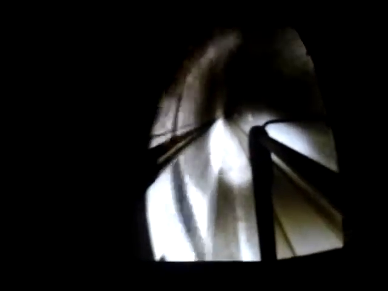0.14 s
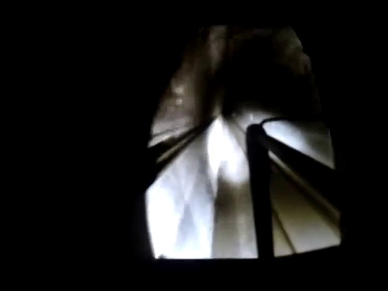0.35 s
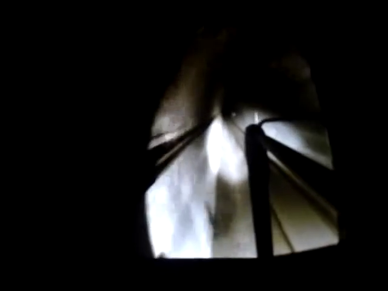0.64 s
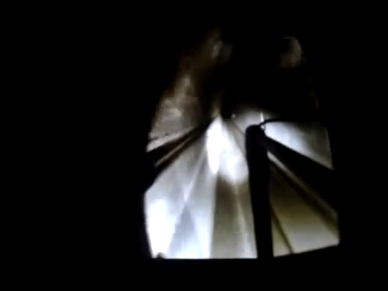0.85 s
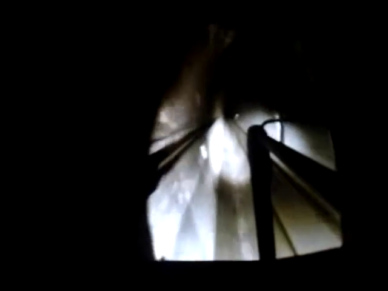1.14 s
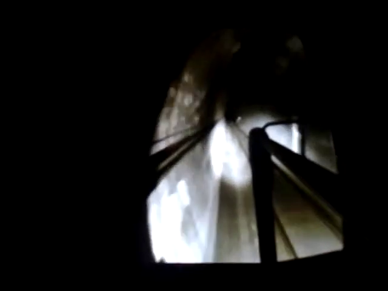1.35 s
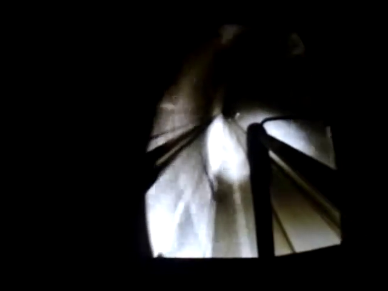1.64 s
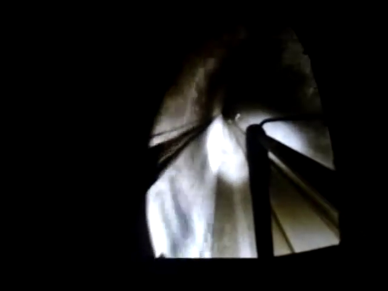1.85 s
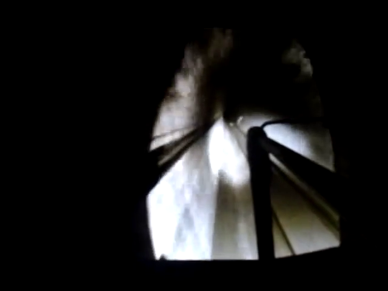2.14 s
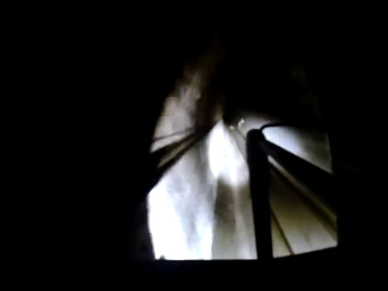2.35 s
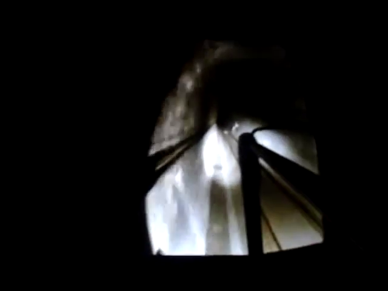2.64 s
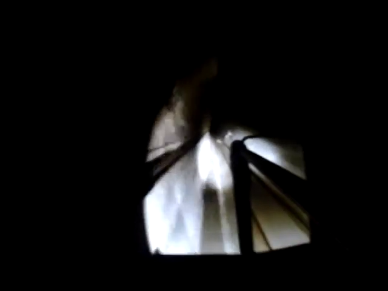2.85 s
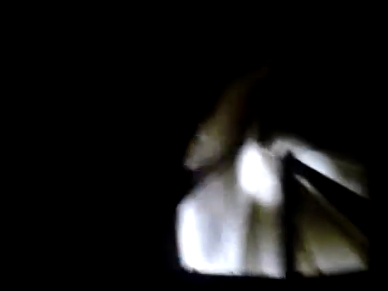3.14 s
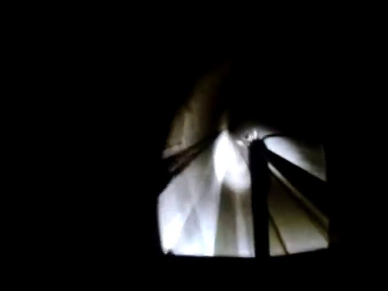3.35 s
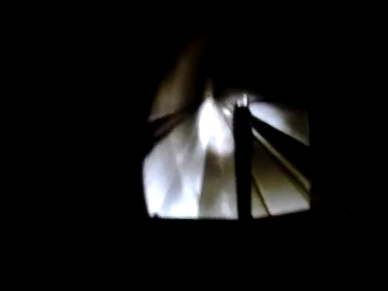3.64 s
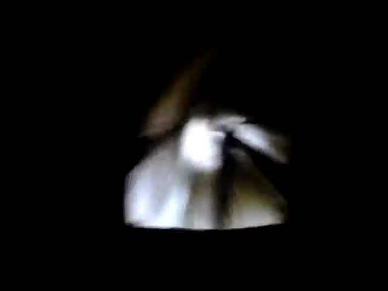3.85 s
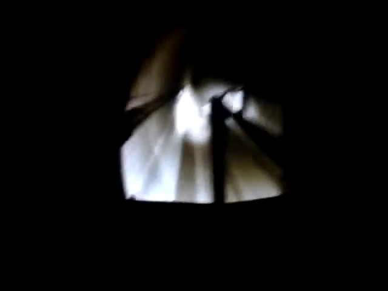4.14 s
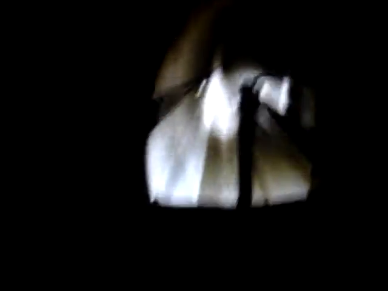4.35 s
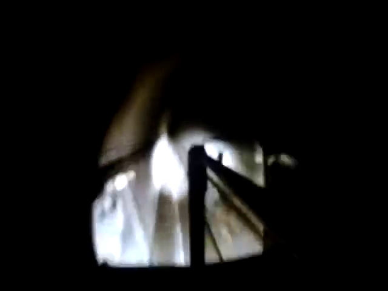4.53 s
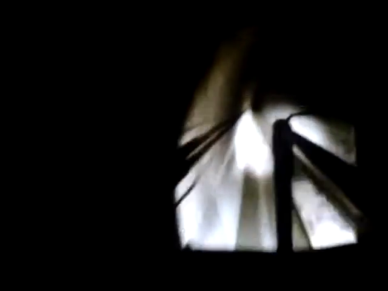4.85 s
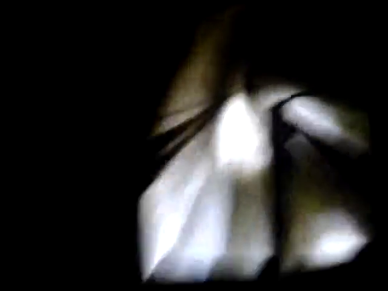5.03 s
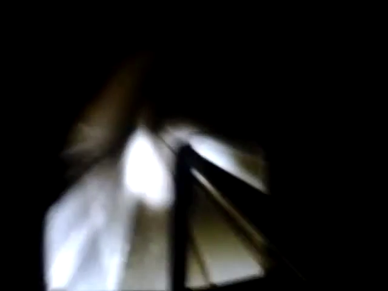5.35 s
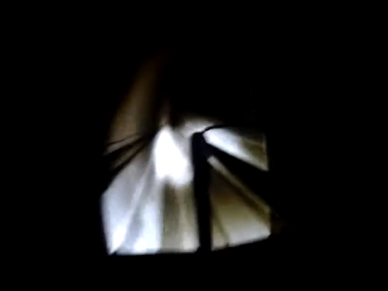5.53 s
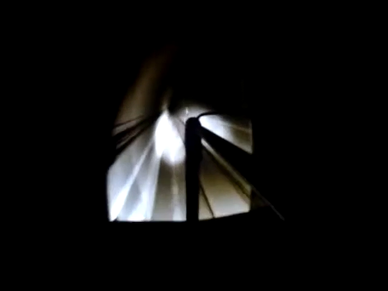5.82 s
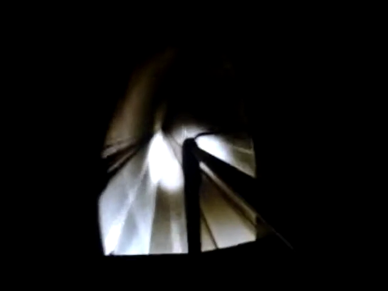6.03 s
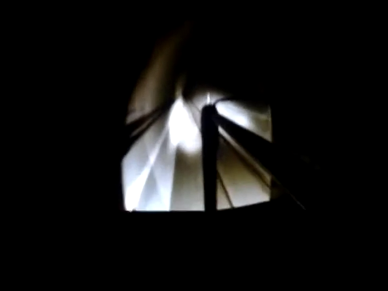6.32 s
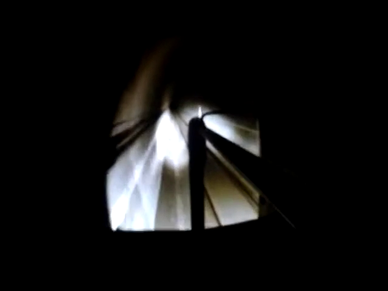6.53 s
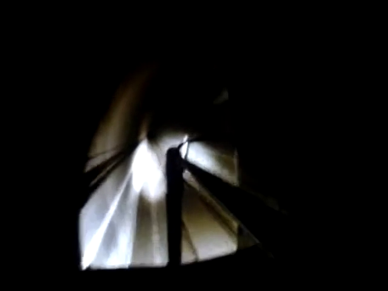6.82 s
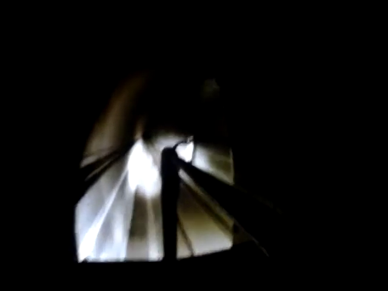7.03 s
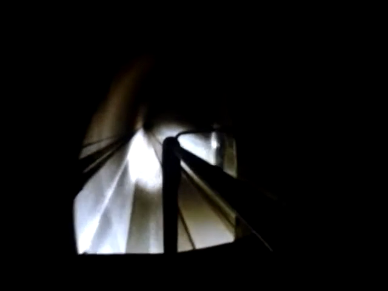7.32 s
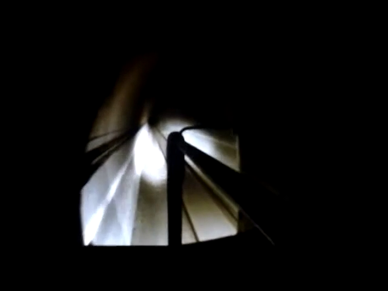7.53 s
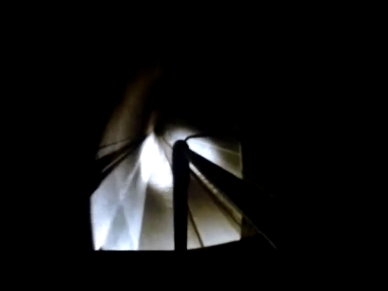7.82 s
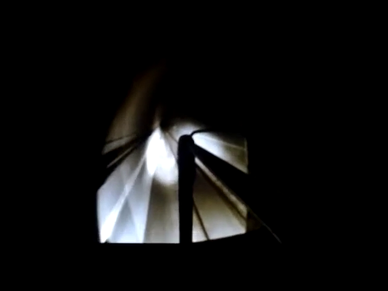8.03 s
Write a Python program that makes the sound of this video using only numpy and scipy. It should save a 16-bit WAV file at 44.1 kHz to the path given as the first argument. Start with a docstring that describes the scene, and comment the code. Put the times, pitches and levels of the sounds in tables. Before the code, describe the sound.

Steady roar of railcar wheels in a tunnel with hissing air, then a click and scrape before the wind rush grows louder and harsher.

```python
"""The roar of wheels in a tunnel is heard first, with air rushing past a window in gusts and lulls.
A diesel railcar carries the hand-held camera; its faint engine and gear whine lie beneath.
The camera is shifted with a click and a scrape, and the rush turns louder and harsher.
Roar and rush are noise with moving spectra, engine and gears are sums of sines, and knocks and
clicks are decaying bursts of band noise."""
import sys
import numpy as np
from scipy import signal
from scipy.fft import rfft, irfft
from scipy.io import wavfile
from scipy.ndimage import uniform_filter1d

SR = 44100
rng = np.random.default_rng(int(sys.argv[2]) if len(sys.argv) > 2 else 0)


def persist_wave(psi):
    """Save psi, clipped to +-1, as 16-bit WAV."""
    counts = np.round(np.clip(psi, -1, 1) * 32767).astype(np.int16)
    wavfile.write(sys.argv[1], SR, np.atleast_2d(counts).T)


N = 360728
TIME = np.arange(N) / SR  # s

# reflections in the sheltered corner that cancel or lift bands: f/Hz, width/Hz, level/dB
CORNER_BANDS = [(2335, 79, -8), (4640, 85, -0.5), (5220, 190, 2.5), (5870, 230, -6), (6340, 170, 9),
                (7280, 190, -8.5), (7760, 130, 0), (8700, 180, -3), (9600, 180, -7), (10150, 200, 3),
                (10900, 180, -5)]
# lulls, when the flow breaks away from the window:
# t/s, length/s, depth/dB, strength of the further treble loss/dB
FLOW_LULLS = [(4.19, 0.23, 0, 10), (4.23, 0.044, 4, 0), (5.669, 0.094, 2, 10), (5.755, 0.044, 5, 1),
              (6.32, 0.19, 2.5, 0), (6.655, 0.088, 1, 7), (7.506, .06, 2, 0)]


def gain_of(db):
    """Level to amplitude: 20 dB is a factor of ten."""
    return 10 ** (np.asarray(db) / 20)


def evened(x):
    """Normalization to unit root-mean-square value."""
    return x / np.sqrt(np.mean(x ** 2) + 1e-20)


def read(points, hz):
    """Spectral level in dB, interpolated linearly along a log-frequency axis."""
    f, db = np.transpose(points)
    return np.interp(np.log(hz + 1), np.log(f + 1), db)


def follow(rows, t):
    """Linear interpolation in time of each column of a curve."""
    s, *columns = np.transpose(rows)
    return [np.interp(t, s, column) for column in columns]


def bell(hz, centre, width):
    """Gaussian resonance curve of height 1; the width is its standard deviation."""
    return np.exp(-.5 * ((hz - centre) / width) ** 2)


def bands(rows, hz):
    """Superposition in dB of Gaussian peaks and hollows."""
    return sum(db * bell(hz, centre, width) for centre, width, db in rows)


def swells(rows, t):
    """Superposition in dB of Gaussian swells, each as long as its width at half height."""
    return sum(db * 2 ** -np.minimum((2 * (t - s) / length) ** 2, 20) for s, length, db in rows)


def noise(shape_db):
    """Stationary noise of rms 1: white noise filtered by a function of frequency in dB."""
    spectrum = rfft(rng.standard_normal(N))
    hz = np.fft.rfftfreq(N, 1 / SR)
    return evened(irfft(spectrum * gain_of(shape_db(hz)), N))


def wander(slow_hz, fast_hz):
    """Random modulation: slow noise of rms 1, band-limited between two rates."""
    count, rate_hz = 4096, 400
    f = np.fft.rfftfreq(count, 1 / rate_hz)
    above_slow = 1 + (slow_hz / (f + 1e-6)) ** 4
    below_fast = 1 + (f / fast_hz) ** 4
    band = (above_slow * below_fast) ** -.5
    drift = evened(irfft(rfft(rng.standard_normal(count)) * band))
    return np.interp(TIME, np.arange(count) / rate_hz, drift)


def burst(s, rise, decay, centre_hz, octaves):
    """Impulsive excitation: band noise of rms 1 under an envelope that peaks at 1 at time s."""
    count = 2 ** 14
    hz = np.fft.rfftfreq(count, 1 / SR)
    shape = bell(np.log2(hz + 1), np.log2(centre_hz), octaves)
    band = evened(irfft(rfft(rng.standard_normal(count)) * shape))
    t = TIME - s
    envelope = np.exp(-np.minimum(np.maximum(-t / rise, t / decay), 20))
    return np.resize(band, N) * envelope


def microphone_hiss(level_db=-65):
    """Self-noise of the microphone: faint, white and stationary."""
    return gain_of(level_db) * rng.standard_normal(N)


def engine(waver=0.0045, throb_db=1.0):
    """Periodic combustion: harmonics of the crankshaft rate, which sags at two gear changes."""
    # crankshaft: t/s, f/Hz
    shaft_curve = [(0, 31.66), (1.0, 28.48), (1.4, 30.31), (3.0, 31.83), (3.95, 31.55), (5.05, 27.6),
                   (8.18, 29.1)]
    # orders: multiple of the crankshaft rate, relative level/dB
    orders = [(4, -15.5), (6, -4.5), (7, -3), (8, -6), (9, -2.5), (10, -3.5), (12, -2)]
    idle_db, idle_hz = -58, 28.6
    db_per_hz, coast_db_per_hz_s = 1.8, 1.2  # louder with speed, quieter while it slows down
    shaft_hz = follow(shaft_curve, TIME)[0]
    slowing = np.maximum(-np.gradient(shaft_hz, TIME), 0)  # Hz/s
    level_db = idle_db + db_per_hz * (shaft_hz - idle_hz) - coast_db_per_hz_s * slowing
    angle = 2 * np.pi * np.cumsum(shaft_hz * (1 + waver * wander(0.75, 9.7))) / SR
    harmonics = 0
    for order, db in orders:
        amplitude = gain_of(db + throb_db * wander(1, 8.1))
        harmonics = harmonics + amplitude * np.sin(order * angle + 2 * np.pi * rng.random())
    return gain_of(level_db) * harmonics


def gear_tone(hz, db, waver=0.0054, throb_db=3.6):
    """Tooth-mesh tone: a sine with small random modulation of frequency and amplitude."""
    amplitude = gain_of(db + throb_db * wander(3.2, 14))
    return amplitude * np.sin(2 * np.pi * np.cumsum(hz * (1 + waver * wander(2.4, 19))) / SR)


def whine():
    """Mesh and resonance: a gear tone sinks as a panel drones; later two drive tones swell."""
    # sinking gear tone: t/s, f/Hz, level/dB
    sinking = [(0, 840, -43), (.25, 841, -34.5), (.6, 820, -37.5), (.9, 795, -38), (1.13, 757, -37),
               (1.4, 735, -59), (1.9, 680, -63)]
    # ringing body panel: t/s, level/dB
    panel_level = [(0, -41), (.5, -43), (.75, -50.5)]
    # the drive sings at full speed: t/s, level/dB
    singing = [(2.4, -61), (3.1, -41), (3.65, -39.5), (4.1, -43), (4.6, -54)]
    # tones of the singing drive: f/Hz, relative level/dB
    sing_tones = [(757, 1.5), (998, 0)]
    panel_hz, panel_width_hz = 460.4, 14
    resonance = noise(lambda f: -20 * np.log10(1 + ((f - panel_hz) / panel_width_hz) ** 2))
    panel = gain_of(follow(panel_level, TIME)[0]) * resonance
    sing_db = follow(singing, TIME)[0]
    drive = sum(gear_tone(hz, sing_db + db) for hz, db in sing_tones)
    return gear_tone(*follow(sinking, TIME)) + panel + drive


def handling(octaves=0.86):
    """Contact and friction: fingers on the camera body give dry clicks and scrapes."""
    # touches: t/s, level/dB, rise/s, decay/s, centre f/Hz
    touches = [(3.0288, -10, 0.00016, 0.00056, 9700), (3.03, -56, .004, 0.011, 50),
               (3.033, -43, .002, .01, 11000), (3.099, -29, 0.0074, 0.0077, 12000),
               (3.106, -19, 0.00034, 0.0008, 9500), (3.145, -42, .015, .025, 11000),
               (3.161, -32, .001, .003, 10000), (3.81, -56, 0.018, .03, 12500),
               (3.866, -38, 0.0032, .004, 12400), (4.35, -62, .02, .04, 12500),
               (4.515, -45, .001, .002, 8000), (4.57, -55, .02, .006, 12500)]
    return sum(gain_of(db) * burst(s, rise, decay, hz, octaves) for s, db, rise, decay, hz in touches)


def jolts(rise=0.002, octaves=0.64):
    """Impact excitation: jolts from the track are short decaying bursts of noise."""
    # knocks: t/s, level/dB, centre f/Hz, decay/s
    knocks = [(.125, -33, 1500, 0.013), (1.052, -27, 700, 0.021), (1.395, -25.5, 2030, 0.03),
              (2.84, -29, 3230, 0.019), (3.47, -19, 2200, 0.0034), (4.026, -21.5, 2500, 0.05),
              (4.278, -18, 2310, 0.016), (5.44, -18, 2300, 0.02), (6.425, -18.5, 2220, 0.016)]
    return sum(gain_of(db) * burst(s + rise, rise, decay, hz, octaves) for s, db, hz, decay in knocks)


def gusting(t):
    """Unsteady flow: gusts lift its level in dB and lulls drop it."""
    # gusts that hit the window: t/s, length/s, strength/dB
    gusts = [(.12, 0.14, 4), (1.41, 0.055, 3), (4.39, 0.086, 3.5), (5.03, 0.069, 1), (5.49, 0.091, 2.5),
             (6.02, .16, 1.5), (6.245, 0.043, 0.5), (6.47, 0.093, 2.5), (6.59, 0.064, 2), (6.83, 0.12, 2),
             (7.39, 0.17, 2.5), (7.66, .12, 1.5), (8.11, 0.056, 3)]
    drops = [(s, length, db) for s, length, db, _ in FLOW_LULLS]
    return swells(gusts, t) - swells(drops, t)


def wheels(flutter_db=0.7, ring_hz=630, ring_width_hz=90, thinning=1.0):
    """Rolling contact: rail roughness excites a fluttering roar, hollow while the cab resonates."""
    # spectrum of the wheels in the tunnel: f/Hz, relative level/dB
    roar_spectrum = [(18, -80), (30, -48), (65, -57), (112, -29), (139, -35.5), (179, -20.5), (246, -24),
                     (282, -11), (412, -10), (451, -10.5), (502, -7), (649, 1.5), (722, -2), (920, -0.5),
                     (1120, -14), (1460, -24), (2460, -120)]
    # loudness of the wheels before gusts and flutter: t/s, level/dB
    rolling = [(0, -34), (1.05, -32.5), (1.9, -35.5), (3.0, -33.5), (3.58, -29), (4.05, -34), (4.92, -30.5),
               (4.99, -25), (5.1, -27.5), (5.42, -27), (5.62, -30.5), (8.18, -32)]
    t = np.arange(N // 512 + 5)[:, None] * 512 / SR
    hz = np.fft.rfftfreq(2048, 1 / SR)
    hollow_db = 2.5 * bell(t, 4.88, 0.43)  # centre and spread in s
    hollow_shape = bell(hz, ring_hz, ring_width_hz) - thinning * bell(hz, 340, 160)
    colour = gain_of(read(roar_spectrum, hz) + hollow_db * hollow_shape)
    a, b = rng.standard_normal((2,) + colour.shape)
    # each frame is normalized, so the colour does not alter the loudness
    z = (a + 1j * b) * colour / np.linalg.norm(colour, axis=1, keepdims=True)
    roar = evened(signal.istft(z.T, nperseg=2048, noverlap=1536)[1][:N])
    level_db = follow(rolling, TIME)[0] + gusting(TIME)
    return roar * gain_of(level_db + flutter_db * wander(3.8, 22))


def frame_echo(t, hz, null_width=0.12, lift_ratio=1.71, lift_width=0.22):
    """Interference, in dB: the window frame's echo cancels one band and lifts a higher one."""
    # gliding reference of the echo as the camera passes the frame: t/s, f/Hz
    glide = [(2.8, 2150), (2.92, 2630), (2.99, 2750), (3.05, 3450), (3.11, 2900), (3.17, 2960),
             (3.25, 3670), (3.5, 4040)]
    from_s, rise_s, until_s, fade_s = 2.76, 0.24, 3.61, 0.25
    depth_db, lift_db = 16, 6.5
    multiple = hz / follow(glide, t)[0]
    near = np.clip(np.minimum((t - from_s) / rise_s, (until_s - t) / fade_s), 0, 1)
    lift = lift_db * np.sqrt(near) * bell(multiple, lift_ratio, lift_width)
    return lift - depth_db * near * bell(multiple, 0.98, null_width)


def muffling(t, hz):
    """Flow separation, as a loss in dB: treble drops in a lull and corner reflections show through."""
    loss_db = swells([(s, length, db) for s, length, _, db in FLOW_LULLS], t)
    corner_per_db = .055  # share of the reflections for each dB of loss
    return loss_db * (bell(hz, 7850, 830) - corner_per_db * bands(CORNER_BANDS, hz))


def slipstream(patchy_db=0.98, buffet_db=0.81, split_hz=3900):
    """Turbulence: broadband rush and hiss, coloured by a gap resonance and by reflections."""
    # spectra of the air at three places of the microphone: f/Hz, relative level/dB
    sheltered = [(680, -26), (1150, -4.5), (1980, 4.5), (3770, -1.5), (4390, -12), (5160, -5.5),
                 (5820, -13), (6420, -17.5), (7390, -24), (15500, -59.5)]
    at_frame = [(680, -51), (1150, -13.5), (1660, -6), (1980, 1.5), (2380, -4.5), (3200, -4), (3770, -11),
                (4150, -10.5), (4730, -13.5), (6010, -12), (7720, -26), (8610, -27), (9920, -41),
                (15500, -63)]
    in_stream = [(680, -56), (1150, -16.5), (1370, -14), (1480, -10.5), (2000, 2), (2360, -7), (2960, -3),
                 (3730, -10.5), (4390, -8), (6150, -18), (6930, -37), (8520, -30), (11200, -51),
                 (15500, -60)]
    # lifts and a dip in the colour of the air in the stream: f/Hz, width/Hz, level/dB
    stream_bands = [(3060, 110, 1.5), (3700, 110, -4), (4220, 130, 2), (7070, 600, 5)]
    # t/s, place (0 sheltered, 1 at the frame, 2 in the stream), gap resonance level/dB
    place_curve = [(0, 0.07, 0.5), (2.5, 0.32, -0.5), (3.1, 0.73, 2.5), (3.6, 1.27, 4), (4.8, 0.66, -0.5),
                   (5.05, 0.85, -4), (5.4, 1.4, -0.5), (5.65, 1.3, 2.5), (5.82, 1.9, 0.5), (8.18, 1.9, 0.5)]
    # air reaching the microphone as the camera leans out, before gusts and buffeting:
    # t/s, rush level/dB, hiss level/dB
    airflow = [(0, -30, -32), (0.55, -31, -33), (0.95, -34.5, -42), (1.25, -31, -33), (2.2, -30, -32.5),
               (2.8, -32, -35), (3.07, -29, -31.5), (3.1, -22.5, -25), (3.28, -24, -31),
               (3.68, -17.5, -26.5), (3.95, -22, -31.5), (4.72, -27, -37.5), (4.925, -27, -31),
               (4.98, -21.5, -24.5), (5.25, -20, -25.5), (5.7, -19, -29), (5.83, -19, -25.5),
               (8.18, -20, -27)]
    gap_hz, gap_width_hz = 1980, 130  # air resonance of the window gap
    hiss_per_gust = .9  # dB for each dB of the rush
    t = np.arange(N // 128 + 5)[:, None] * 128 / SR
    hz = np.fft.rfftfreq(512, 1 / SR)

    place, gap_db = follow(place_curve, t)
    colours = [read(sheltered, hz) + bands(CORNER_BANDS, hz),
               read(at_frame, hz),
               read(in_stream, hz) + bands(stream_bands, hz)]
    # neighbouring places cross-fade in dB
    db = sum(np.maximum(1 - abs(np.clip(place, 0, 2) - k), 0) * colour for k, colour in enumerate(colours))
    db = db + gap_db * bell(hz, gap_hz, gap_width_hz)
    db = db + frame_echo(t, hz) - muffling(t, hz)

    colour_power = gain_of(db) ** 2
    upper = 1 / (1 + (split_hz / (hz + 1)) ** 10)
    rush_db, hiss_db = follow(airflow, t)
    gust_db = gusting(t)
    layers = [(rush_db + gust_db, colour_power * (1 - upper)),
              (hiss_db + hiss_per_gust * gust_db, colour_power * upper)]
    power = sum(gain_of(level) ** 2 * part / part.sum(1, keepdims=True) for level, part in layers)

    a, b, eddies = rng.standard_normal((3,) + power.shape)
    # smoothing over time and frequency makes patches of level
    eddies = uniform_filter1d(eddies, size=12, axis=0)
    eddies = evened(uniform_filter1d(eddies, size=10, axis=1))
    z = np.sqrt(power) * (a + 1j * b) * gain_of(patchy_db * eddies)
    # the factor makes up for power lost where independent frames overlap
    air = signal.istft(z.T, nperseg=512, noverlap=384)[1][:N] * np.sqrt(3 / 2)
    return air * gain_of(buffet_db * wander(6.7, 15.5))


def tunnel(x, ripple_db=1.5):
    """Interference: echoes from passing walls lift and cancel narrow bands that slowly shift."""
    z = signal.stft(x, nperseg=2048, noverlap=1536)[2]
    ripple = uniform_filter1d(rng.standard_normal(z.shape), size=2, axis=0)
    ripple = evened(uniform_filter1d(ripple, size=50, axis=1))
    rippled = z * evened(gain_of(ripple_db * ripple))
    return signal.istft(rippled, nperseg=2048, noverlap=1536)[1][:N]


def scene():
    """Superposition: all sources add at one microphone, over its faint hiss."""
    off_the_walls = tunnel(wheels() + slipstream() + jolts())
    aboard = engine() + whine() + handling()
    return (off_the_walls + aboard + microphone_hiss())[None]


def record(dry, cut_hz=60, edge_hz=15800):
    """Band limitation: the small microphone loses deep bass, then a low-pass removes the top."""
    thin = signal.sosfilt(signal.butter(2, cut_hz, "highpass", fs=SR, output="sos"), dry)
    low_pass = signal.firwin(511, edge_hz, window=("kaiser", 9), fs=SR)
    return signal.oaconvolve(thin, low_pass[None], "same")


dry = scene()
out = record(dry)
persist_wave(out)
```